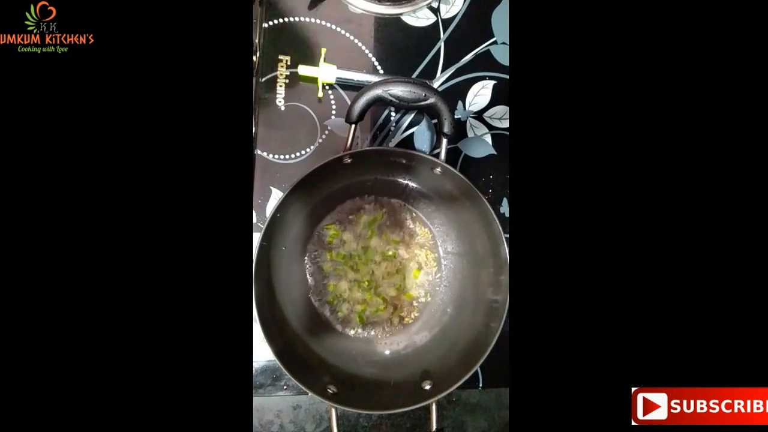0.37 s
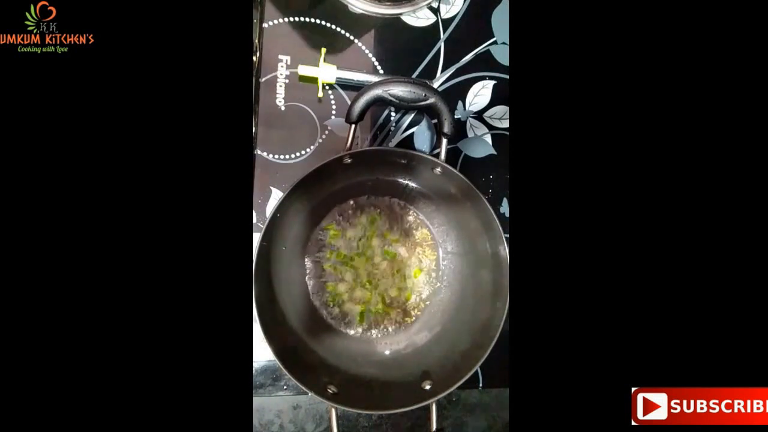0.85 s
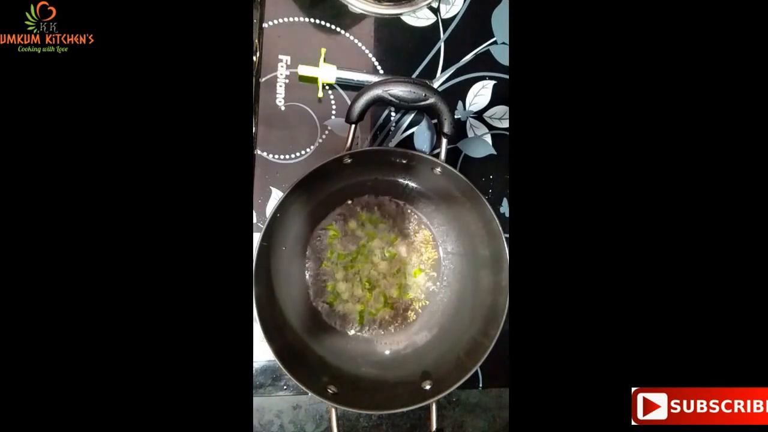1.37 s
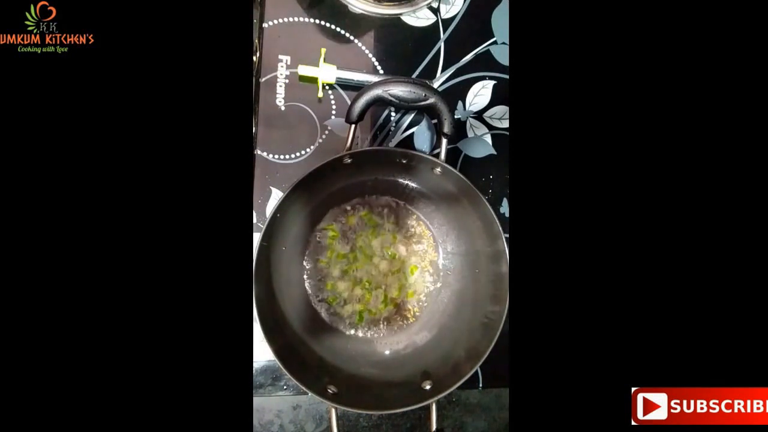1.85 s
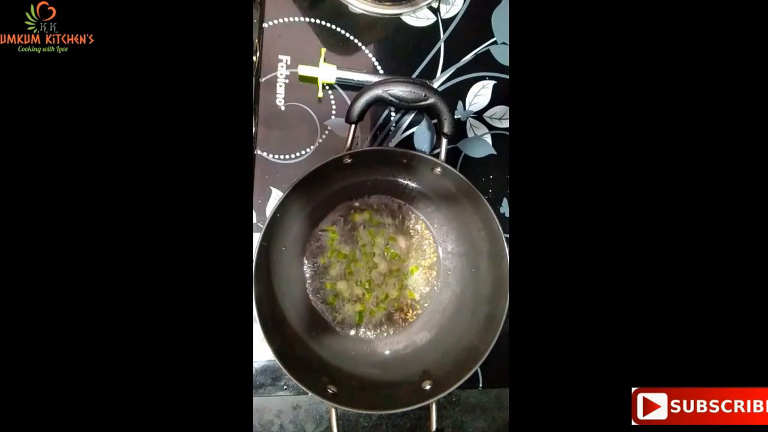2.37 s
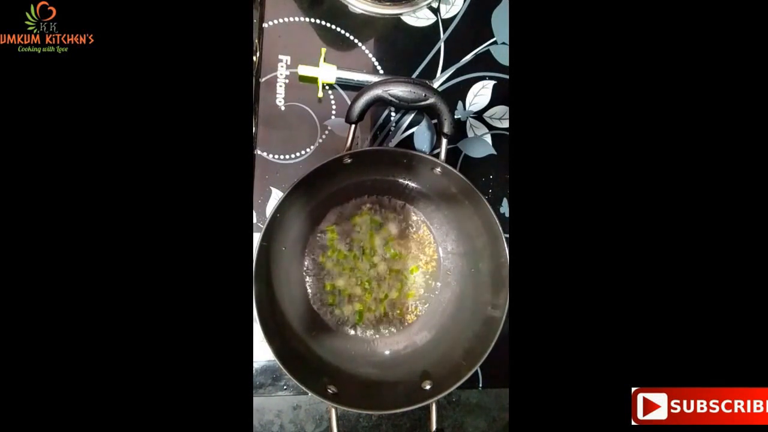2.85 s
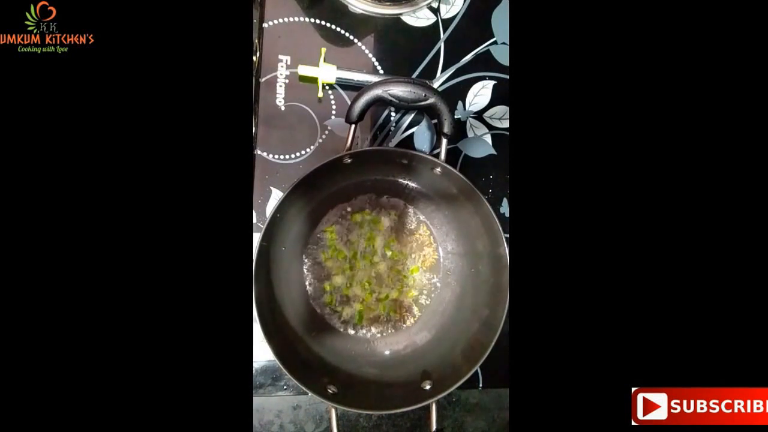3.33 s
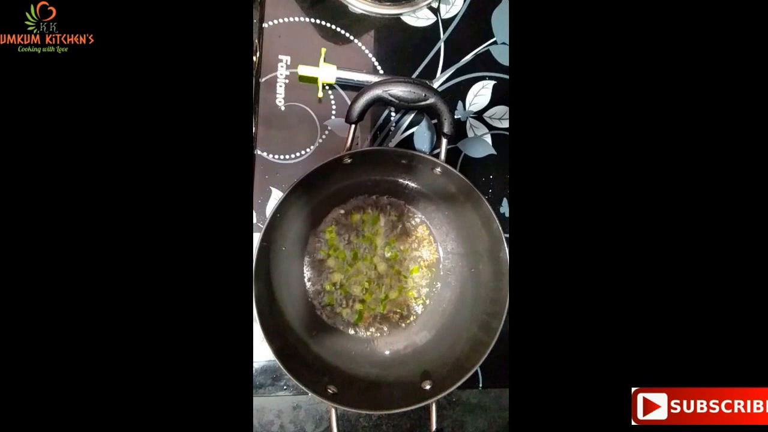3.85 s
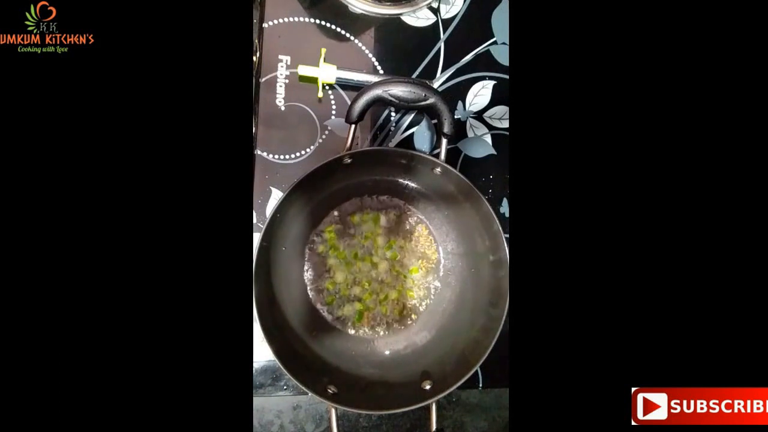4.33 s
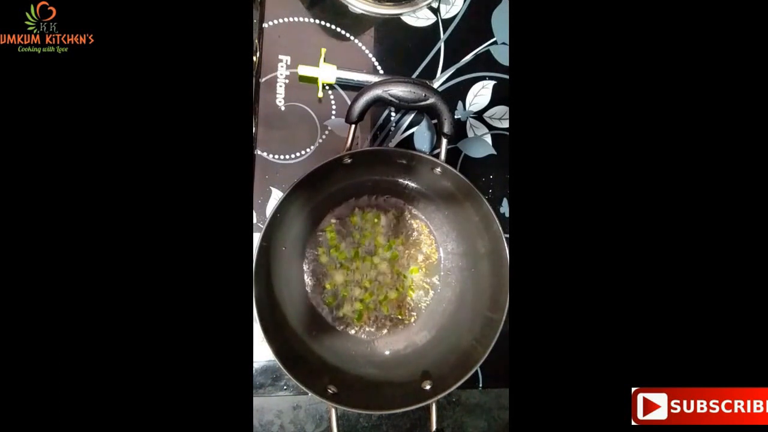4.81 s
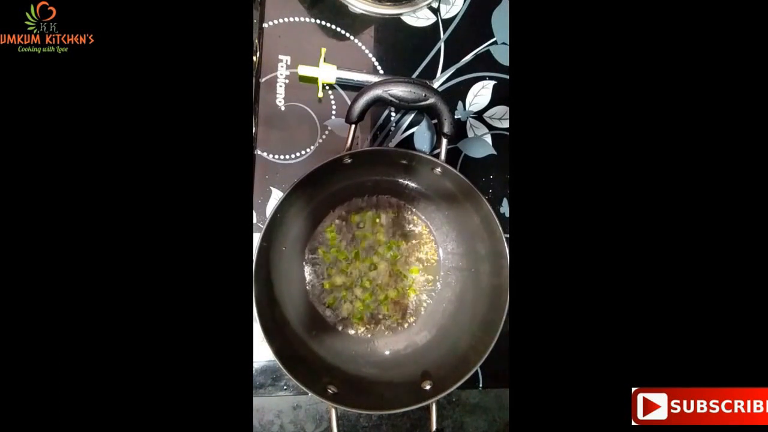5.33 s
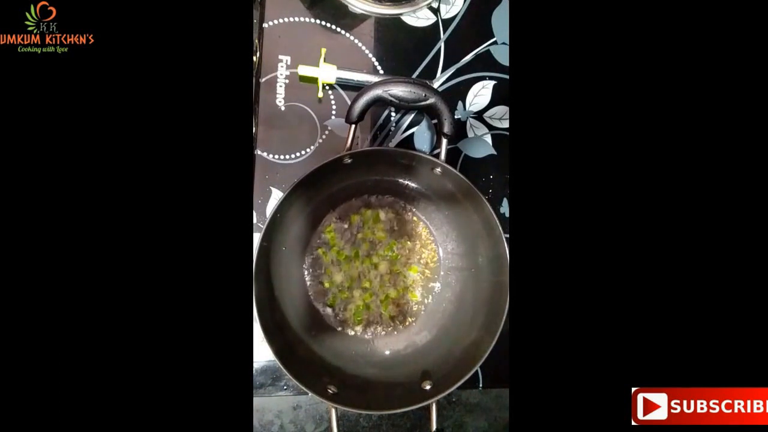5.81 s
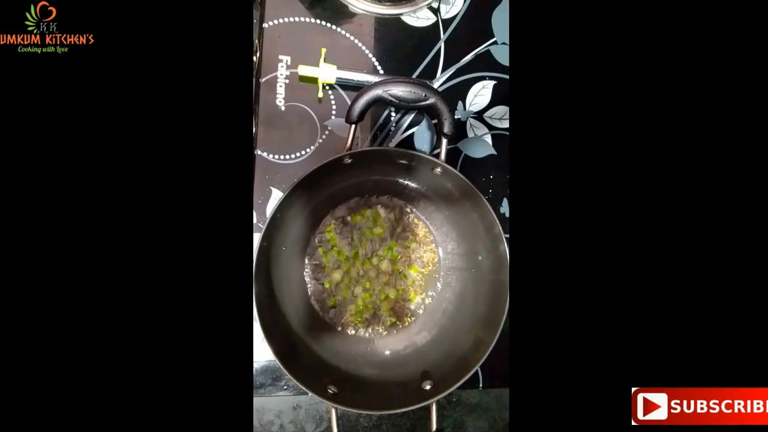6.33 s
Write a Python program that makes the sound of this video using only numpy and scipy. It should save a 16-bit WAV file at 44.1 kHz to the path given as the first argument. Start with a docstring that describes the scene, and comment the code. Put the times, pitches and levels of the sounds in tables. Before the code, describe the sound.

Steady frying heard from just above a deep pan in a home kitchen: a smooth hissing wash under countless tiny ticks, with frequent irregular spits and hollow little bubble pops. The boil is fullest in the first two to three seconds and then softens, though hard snaps continue to the end. The pan adds slight ringing, loud spits bump the small microphone, and distant household thuds are barely audible.

```python
"""A kitchen: chopped chillies and seeds fry in hot oil in a deep pan, a small microphone held above it.
Steam bubbles burst as a dense fizz of tiny snaps; larger ones ring at their own pitch in the bowl.
Oil spits snap and crack; brief one-sided low bumps stand for uneven overload of the microphone.
Behind them lie short echoes of pan and walls and a smooth wash of countless far bursts.
Far thuds in the house stir low tones of the kitchen."""
import sys
import numpy as np
from scipy import signal
from scipy.io import wavfile
from scipy.ndimage import uniform_filter1d

SR = 44100
rng = np.random.default_rng(int(sys.argv[2]) if len(sys.argv) > 2 else 0)


def invert_db(level):
    """Linear amplitude ratio for a level in decibels (20 dB per decade), elementwise."""
    return 10 ** (np.asarray(level, dtype=float) / 20)


def log_audio(samples):
    """Write samples as a 16-bit WAV file to the path given in sys.argv[1]."""
    # one column per channel
    frames = np.atleast_2d(samples).T
    # limit to full scale, then quantise
    limited = np.clip(frames, -1, 1)
    pcm = np.round(limited * 32767).astype(np.int16)
    wavfile.write(sys.argv[1], SR, pcm)


N = 294494

# How hard the oil boils: time_s, fizz_level_db, ringing_bubbles_level_db
BOIL = [(0.0, -19.5, -26.5), (1.08, -22, -27.5), (1.56, -19, -27.5), (2.2, -21, -25.5), (2.6, -21.5, -26),
        (3.85, -24.5, -30.5), (4.43, -23.5, -31), (4.7, -24.5, -33), (5.24, -25, -30.5), (5.8, -25.5, -33),
        (6.3, -25.5, -31), (6.68, -25.5, -34)]
# Colour of a snap at the microphone, which rings near its top: frequency_hz, relative_level_db
SNAP_COLOUR = [(180, -34), (300, -27.5), (985, -7.5), (1200, -17), (1300, -13.5), (1620, -7), (1970, -12.5),
               (3810, -7), (8560, -2.5), (11300, 13), (13200, 4), (15500, -4.5)]


def evened(x):
    """Scales to rms 1."""
    return x / np.sqrt(np.mean(x ** 2) + 1e-20)


def read(points, hz):
    """Reads a spectrum on a log-frequency axis."""
    f, value = np.transpose(points)
    return np.interp(np.log(hz + 1), np.log(f + 1), value)


def curve(table, index):
    """One column of a curve table at every sample."""
    rows = np.array(table)
    return np.interp(np.arange(N) / SR, rows[:, 0], rows[:, index])


def add(mix, s, sound):
    """Mixes a sound in at s seconds."""
    part = mix[round(s * SR):][:len(sound)]
    part += sound[:len(part)]


def causal(db_of, size=4096):
    """The shortest causal (minimum-phase) response with a given colour."""
    hz = abs(np.fft.fftfreq(size, 1 / SR))
    log_gain = np.log(invert_db(np.maximum(db_of(hz), -100)))
    spectrum = np.exp(np.conj(signal.hilbert(log_gain)))
    return np.fft.ifft(spectrum).real[:size // 2]


def clumps(seconds):
    """Bursts set each other off: a chance curve of rms 1 that all sizes of bubble share."""
    return evened(uniform_filter1d(rng.standard_normal(N), max(int(seconds * SR), 2)))


def bursts(clump, per_s, spread_db, clump_db):
    """Random clicks, a few large, denser where the clump curve is high."""
    chance = rng.random(N)
    size = np.minimum(rng.exponential(1, N), 3.5)
    sign = rng.choice([-1., 1.], N)
    happens = chance < per_s / SR * invert_db(clump_db * clump)
    return sign * invert_db(spread_db * size) * happens


def ring(hz, u):
    """One bubble, peak 1: a sudden tone that dies in a few cycles; large low ones just crack."""
    # the three chances u vary the ring's length, its glide and its starting phase
    cycles = 3.8 * (hz / 4000) ** 0.35 * np.exp(0.2 * u[0]) / (1 + (2100 / hz) ** 3)
    turns = hz * np.arange(400) / SR
    tone = np.sin(2 * np.pi * turns * (1 + 0.003 * u[1] * turns) + 0.3 * u[2])
    rise = 1 - np.exp(-turns / (0.02 * cycles ** 2))
    motion = tone * rise * np.exp(-turns / cycles)
    sound = np.diff(motion, prepend=0)  # sound follows the change of the motion
    return sound / abs(sound).max()


def swarm(train, lo_hz, hi_hz, count=24):
    """Each click of a train rings one of many bubble sizes, coloured by bowl and microphone."""
    out = np.zeros(N)
    kind = rng.integers(0, count, N)
    pitches = np.geomspace(lo_hz, hi_hz, count)
    chances = rng.standard_normal((count, 3))
    for k, (hz, u) in enumerate(zip(pitches, chances)):
        one = invert_db(read(SNAP_COLOUR, hz) + bowl_db(hz)) * ring(hz, u)
        out += signal.oaconvolve(train * (kind == k), one)[:N]
    return evened(out)


def fizz(clump):
    """The finest bubbles ring at the top; bare ticks of tearing film cover the whole band."""
    fine_train = bursts(clump, per_s=300, spread_db=5.5, clump_db=3.0)
    fine = swarm(fine_train, lo_hz=10140, hi_hz=14900)
    tick = causal(lambda hz: read(SNAP_COLOUR, hz))
    tick_train = bursts(clump, per_s=600, spread_db=4.0, clump_db=5.0)
    ticks = evened(signal.oaconvolve(tick_train, tick)[:N])
    return invert_db(curve(BOIL, index=1)) * (invert_db(-11.5) * fine + invert_db(-4.0) * ticks)


def bubbles(clump):
    """Larger bubbles: many small ones at random, the loudest at their moments."""
    # The loudest ringing bubbles, each at its own pitch: start_s, level_db, pitch_hz
    pops = [(0.0944, -8, 3770), (0.1431, -7.5, 3580), (0.165, -9.5, 3730), (0.171, -6, 1830),
            (0.1878, -13, 1620), (0.2587, -15, 4650), (0.2793, -9, 5700), (0.3739, -12, 2710),
            (0.47, -13, 3850), (0.5038, -15, 2840), (0.6391, -6, 3420), (0.6558, -9, 3320),
            (0.8529, -7.5, 2670), (0.9648, -10.5, 3190), (1.0193, -9, 4600), (1.1701, -13, 2630),
            (1.2046, -5, 3750), (1.2188, -7, 3450), (1.3494, -11, 5740), (1.4462, -9, 3500),
            (1.456, -10.5, 2900), (1.5046, -12, 4900), (1.5247, -8.5, 3630), (1.6077, -13, 3840),
            (1.6472, -10.5, 3760), (1.8663, -7.5, 3980), (1.8764, -9.5, 2950), (1.9974, -9.5, 4000),
            (2.0691, -11, 3720), (2.0878, -7, 4260), (2.1437, -10.5, 5000), (2.295, -9, 3500),
            (2.3817, -8.5, 2630), (2.4148, -8.5, 4360), (2.4432, -11.5, 4200), (2.6502, -9, 3000),
            (2.7445, -13, 3500), (2.8832, -12.5, 4130), (2.9573, -15, 4270), (3.0918, -12, 3360),
            (3.12, -8.5, 3000), (3.2339, -7.5, 3700), (3.2507, -8, 6560), (3.3427, -7.5, 3160),
            (3.3711, -10.5, 3650), (3.4004, -10, 4600), (3.4618, -9, 3300), (3.4979, -11.5, 3840),
            (3.56, -12, 5700), (3.604, -9, 4300), (3.673, -9.5, 4970), (3.7215, -12, 5730),
            (3.8134, -7, 4350), (3.8446, -10, 3600), (3.889, -8, 5720), (3.9168, -13.5, 4640),
            (4.0637, -13, 4600), (4.087, -15, 3760), (4.3189, -10, 4460), (4.3513, -10.5, 3500),
            (4.3739, -18, 3680), (4.4936, -12.5, 4760), (4.5196, -7, 4670), (4.614, -10, 4600),
            (4.6547, -13.5, 4230), (4.7723, -13.5, 4730), (4.896, -11, 3400), (4.9228, -9.5, 4100),
            (4.9464, -5.5, 3370), (5.1445, -11.5, 4400), (5.186, -10, 6570), (5.2644, -16, 4400),
            (5.3938, -14, 4260), (5.5181, -12.5, 4660), (5.5537, -11, 4390), (5.578, -17, 4960),
            (5.6906, -9, 5400), (5.7128, -16, 4000), (5.7736, -18.5, 3170), (5.948, -19.5, 4050),
            (6.1068, -13.5, 6200), (6.1177, -18, 3810), (6.2688, -6.5, 3600), (6.3324, -14, 4350),
            (6.4746, -11, 6700), (6.5418, -17, 3400)]
    train = bursts(clump, per_s=1000, spread_db=4.5, clump_db=2.5)
    small = swarm(train, lo_hz=1890, hi_hz=8290, count=36)
    out = invert_db(curve(BOIL, index=2) - 2.5) * small
    for (s, db, hz), u in zip(pops, rng.standard_normal((len(pops), 3))):
        add(out, s, invert_db(db) * ring(hz, u))
    return out


def spits(clump):
    """Each spit is one bare snap over the whole band and a crack with a hard edge; small ones come at random."""
    # Oil spits, the large ones with a low crack under the snap: start_s, snap_level_db, crack_level_db
    large_spits = [(0.1438, -9, -19), (0.1707, -12, -14), (0.1887, -9, -9), (0.2154, -10, -16),
                   (0.243, -2, -19), (0.261, -4, -27), (0.3499, 3, -21), (0.4514, 2, -28),
                   (0.4655, -17, -16), (0.4925, 0, -36), (0.64, -5, -13), (0.7002, -3, -10),
                   (0.8422, -4, -25), (0.874, 2, -26), (0.9473, -10, -7.5), (1.0216, 6, -32),
                   (1.0795, -11, -10.5), (1.187, -2, -37), (1.2464, -13, -20), (1.2978, -11, -24),
                   (1.3387, -5, -9.5), (1.4084, -1, -32), (1.4368, -11, -34), (1.5043, -8, -30),
                   (1.5404, -6, -11), (1.5927, 1, -25), (1.621, -11, -12), (1.839, -6, -9),
                   (1.8758, -9, -9), (1.909, 0, -32), (2.0327, 0, -40), (2.1437, 3, -20), (2.3134, 0, -32),
                   (2.4857, -7, -8), (2.2953, -10, -10), (2.3815, -14, -20), (2.4924, 6, -17),
                   (2.5073, 2, -30), (2.5263, -14, -11), (2.5353, -9, -20), (2.597, 2.5, -34),
                   (2.7691, -2, -29), (3.0837, -9, -12), (3.2055, -1, -35), (3.2692, -9, -10),
                   (3.3588, -1, -29), (3.37, 2, -24), (3.371, -3, -2.5), (3.388, -18, -7), (3.8452, -7, -4),
                   (3.905, 0.5, -34), (3.949, -3, -36), (4.0009, -2, -44), (4.087, 0, -19),
                   (4.3426, -4, -30), (4.423, -20, -12), (4.4255, -3, -22), (4.4901, 2, -21),
                   (4.528, 5, -35), (4.566, -2, -13), (4.575, -16, -7.5), (4.6814, -6, -26),
                   (4.9608, -1.5, -45), (5.028, -5, -35), (5.038, -6, -35), (5.072, -7, -42),
                   (5.2002, -8, -15), (5.265, -6, -29), (5.3117, -2, -29), (5.3416, -2, -19),
                   (5.3703, -1, -13), (5.4234, -10, -11.5), (5.5387, -3, -30), (5.6158, 6.5, -12),
                   (5.7742, -9, -11), (5.8826, -16, -14), (6.0158, -2, -32), (6.118, -17, -9.5),
                   (6.19, -15, -24), (6.3544, -8, -20), (6.367, 2, -34), (6.3758, -10, -7),
                   (6.4515, 1, -37), (6.5306, 2, -9.5), (6.5808, -5, -34)]
    crack_hz, crack_low_hz = 954, 455  # pitch, and the corner below which it is too small to sound
    edge_s, edge_db = 0.00003, 3  # the crack starts with a hard edge

    snap = causal(lambda hz: read(SNAP_COLOUR, hz))
    snap = snap[:400] / abs(snap).max()
    t = np.arange(400) / SR
    edge = invert_db(edge_db) * (1 - t / edge_s) * np.exp(-t / edge_s)
    high_pass = signal.butter(2, crack_low_hz, "high", fs=SR)
    cracks = [signal.lfilter(*high_pass, ring(crack_hz, u) + edge)
              for u in rng.standard_normal((len(large_spits), 3))]

    train = bursts(clump, per_s=40, spread_db=3.5, clump_db=4.5)
    small = signal.oaconvolve(train, cracks[0] + invert_db(7.5) * snap)[:N]
    out = invert_db(curve(BOIL, index=1) - 16) * evened(small)
    for (s, snap_db, crack_db), crack in zip(large_spits, cracks):
        add(out, s, invert_db(snap_db) * snap + invert_db(crack_db) * crack)
    return out


def overload_bumps():
    """Brief one-sided low bumps from uneven overload of the microphone, their slowest part filtered off."""
    # Low bumps: start_s, level_db
    bumps = [(0.2142, -29), (0.35, -26.5), (0.4787, -29), (0.7006, -35), (0.875, -44), (1.15, -30),
             (1.2464, -29), (1.3389, -26), (1.5409, -25), (1.8803, -36), (2.492, -24), (2.5262, -28),
             (3.3712, -26), (4.5678, -36), (5.191, -35), (5.38, -31.5), (5.6159, -23), (6.3543, -34),
             (6.5306, -34)]
    out = np.zeros(N)
    u = np.arange(200) / SR / 0.0002  # a fifth of a millisecond to the top
    for s, db in bumps:
        add(out, s, invert_db(db) * u * np.exp(1 - u))
    return signal.lfilter(*signal.butter(1, 40, "high", fs=SR), out)


def echoes(x):
    """Sparse taps of random sign; each band dies at its own speed; three tails take turns."""
    # Decay between pan and walls: frequency_hz, t60_s
    decay = [(500, 0.25), (2000, 0.15), (5000, 0.078), (12000, 0.12)]
    out, size = np.zeros(N), SR // 4
    for k in range(3):
        taps = np.zeros(size)
        at = np.arange(60, size - 20, 20)
        taps[at + rng.integers(0, 20, len(at))] = rng.choice([-1., 1.], len(at))
        hz, t, z = signal.stft(taps, SR, nperseg=64)
        fade = invert_db(-60 * t / read(decay, hz)[:, None])
        tail = signal.istft(z * fade, SR, nperseg=64)[1]
        turn = np.sqrt(2 / 3) * np.cos(np.pi * (np.arange(N) / SR * 7 + k / 3))
        out += signal.oaconvolve(x * turn, tail / np.linalg.norm(tail))[:N]
    return out


def wash():
    """Smooth sizzle of far bursts: noise with drifting patches and flicker shared across bands."""
    # Colour of countless far bursts and their echoes: frequency_hz, relative_level_db
    colour = [(30, -23), (70, -17.5), (150, -19.5), (260, -23), (420, -12.5), (700, -11), (1170, -1.5),
              (1320, -14), (1620, -2), (2000, -11.5), (4300, 1), (8550, 0.5), (11400, 11.5), (15600, 3.5)]
    # Lift of the wash below the corner against the rest of it: time_s, lift_db
    low_lift = [(0.0, 1), (0.5, 3), (1.2, -1.5), (2.2, -1), (3.0, -0.5), (3.9, -4), (4.5, 0.5), (5.0, -3),
                (5.4, 4), (6.0, 2.5), (6.68, 2)]
    corner_hz = 800

    frames, hz = N // 256 + 5, np.fft.rfftfreq(1024, 1 / SR)
    a, b, patches = rng.standard_normal((3, 513, frames))
    patches = evened(uniform_filter1d(uniform_filter1d(patches, 14, 0), 3, 1))  # over bands, then time
    flicker = evened(uniform_filter1d(rng.standard_normal(frames), 2))
    frame_s = (np.arange(frames) - 2) * 256 / SR
    lows = np.interp(frame_s, *np.transpose(low_lift)) / (1 + (hz[:, None] / corner_hz) ** 4)
    level_db = read(colour, hz)[:, None] + lows + 2.03 * patches + 1.7 * flicker
    z = (a + 1j * b) * invert_db(level_db)
    sizzle = signal.istft(z, nperseg=1024, noverlap=768)[1][:N]
    return invert_db(curve(BOIL, index=1) - 2) * evened(sizzle)


def bowl_db(hz):
    """The air in the deep pan lifts a few narrow bands."""
    # Resonances of the bowl: frequency_hz, width_hz, lift_db
    resonances = [(625, 22, 9.5), (768, 29, 3.5), (1192, 31, 5.5), (1637, 32, 6.5), (2860, 28, 9.5),
                  (3810, 140, 6.5), (4600, 350, 5), (5604, 310, 5)]
    return sum(lift / (1 + (2 * (hz - f) / width) ** 2) for f, width, lift in resonances)


def kitchen():
    """Each far thud swells fast and fades on the low tones of the kitchen, blurred by chance."""
    # Far thuds: start_s, low_tone_level_db, high_tone_level_db, length_s
    thuds = [(0.2, -54, -50.5, 0.07), (0.86, -61, -61, 0.12), (1.516, -54, -55.5, 0.2),
             (2.09, -58, -63, 0.18), (2.472, -68, -67, 0.22), (3.351, -59, -57, 0.15),
             (3.71, -74, -65, 0.07), (4.108, -67, -77, 0.09), (4.52, -65, -66, 0.23),
             (5.22, -60, -45, 0.12), (5.659, -72, -61, 0.093)]
    # One brief higher hum: start_s, pitch_hz, level_db, length_s
    hum = [(5.735, 358, -55, 0.09)]
    low_hz, high_hz = 97.7, 169  # what the kitchen booms with
    sub_hz, sub_db = 66, -10  # a deeper tone goes with the low one, this far against it

    booms = []
    for s, low_db, high_db, length in thuds:
        booms.append((s, low_hz, low_db, length))
        booms.append((s, high_hz, high_db, length))
        booms.append((s, sub_hz, low_db + sub_db, length))

    out = np.zeros(N)
    for s, hz, db, length in booms + hum:
        t = np.arange(0, 3 * length, 1 / SR)
        a, b = (evened(uniform_filter1d(v, int(SR / 40))[:len(t)]) for v in rng.standard_normal((2, SR)))
        blurred = ((1 + 0.42 * (a + 1j * b)) * np.exp(2j * np.pi * hz * t)).real
        u = t / (0.45 * length)  # the swell is at its top where u is 1
        swell = (u * np.exp(1 - u)) ** 2.5
        add(out, s, invert_db(db) * swell * evened(blurred))
    return out


def scene():
    """Bursts, then their echoes and the wash coloured by the bowl, with the bumps and the low tones."""
    clump = clumps(seconds=0.008)
    near = fizz(clump) + bubbles(clump) + spits(clump)
    far = signal.oaconvolve(invert_db(-7.0) * echoes(near) + wash(), causal(bowl_db))[:N]
    return (near + far + overload_bumps() + kitchen())[None]


def roll_off(x):
    """The treble ends steeply here."""
    return signal.sosfilt(signal.butter(12, 16680, fs=SR, output="sos"), x)


def record(dry):
    """At the microphone the loudest peaks round off and the band ends sharply."""
    soft = np.tanh(dry * 1.167) / 1.11
    low_pass = signal.firwin(801, 15560, fs=SR)  # band edge in Hz
    cut = signal.oaconvolve(soft, low_pass[None], "same")
    return roll_off(cut)


dry = scene()
out = record(dry)
log_audio(out)
```